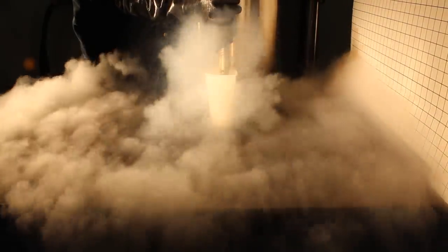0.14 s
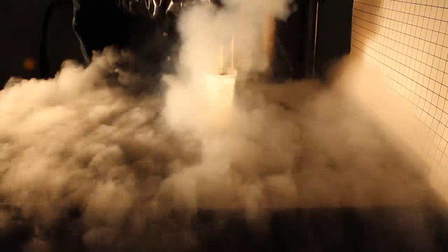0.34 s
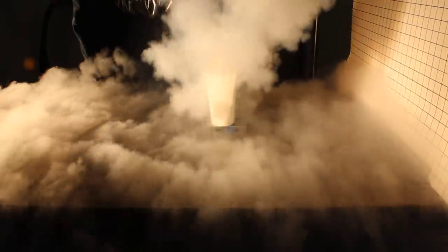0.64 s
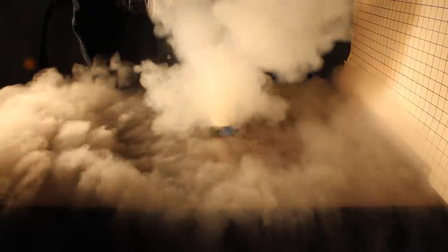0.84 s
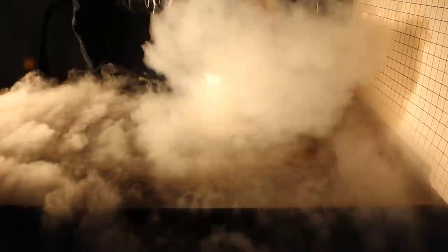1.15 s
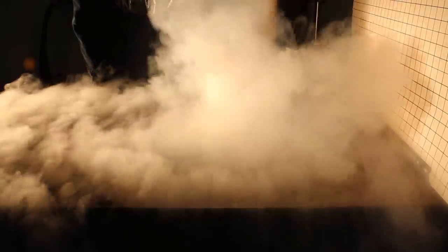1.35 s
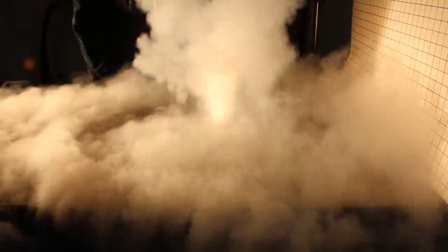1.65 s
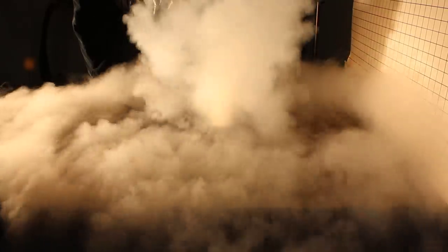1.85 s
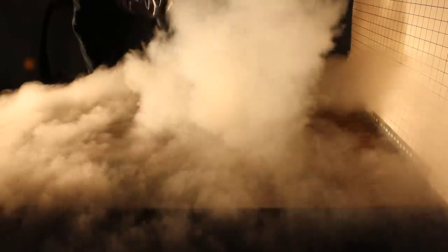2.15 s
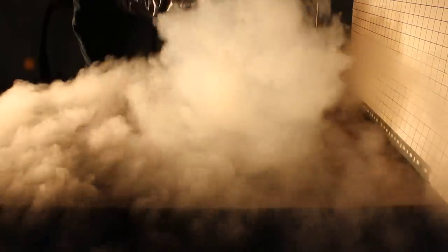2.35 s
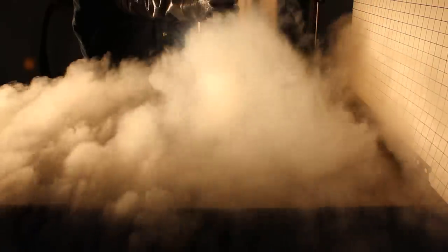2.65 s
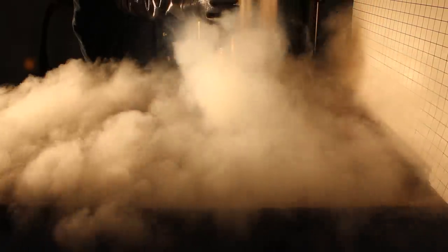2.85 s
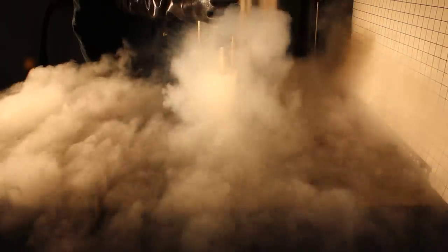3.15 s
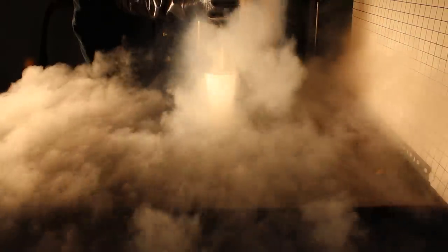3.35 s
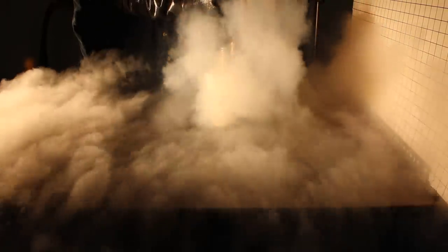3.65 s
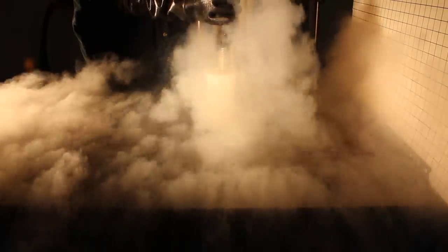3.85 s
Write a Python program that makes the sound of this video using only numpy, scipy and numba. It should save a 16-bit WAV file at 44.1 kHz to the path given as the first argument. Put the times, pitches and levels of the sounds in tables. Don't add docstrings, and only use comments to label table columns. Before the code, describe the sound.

Boiling, fizzing liquid in a cup gushes hollow vapour bursts over a faint fan hum

```python
import sys
import numpy as np
from scipy import signal
from scipy.fft import rfft, irfft, next_fast_len
from scipy.io import wavfile
from numba import njit

SR = 44100
rng = np.random.default_rng(int(sys.argv[2]) if len(sys.argv) > 2 else 0)


def voltage_ratio(level):
    return 10 ** (np.asarray(level, float) / 20)


def unload_audio(sound):
    columns = np.transpose(np.atleast_2d(sound))
    steps = np.round(np.clip(columns, -1, 1) * 32767)
    wavfile.write(sys.argv[1], SR, steps.astype(np.int16))


N = 176400
T = np.arange(N) / SR


def rms_one(x):
    return x / np.sqrt(np.mean(x ** 2) + 1e-20)


def in_time(rows):
    s, *columns = np.transpose(rows)
    return [np.interp(T, s, column) for column in columns]


def drift(rate_hz):
    step = 40
    r = np.exp(-2 * np.pi * rate_hz * step / SR)
    settle = 2000
    noise = rng.standard_normal(N // step + settle + 2)
    slow = signal.lfilter([1], [1, -2 * r, r * r], noise)[settle:]
    return np.interp(np.arange(N) / step, np.arange(len(slow)), rms_one(slow - slow.mean()))


def fizz(grain_share, per_s, spread_db, flicker_db):
    burst = rng.random(N) < per_s / SR
    size_db = spread_db * np.minimum(rng.exponential(1, N), 5)
    pops = burst * voltage_ratio(size_db) * rng.choice([-1, 1], N)
    share = np.clip(grain_share, 0, 1)
    mix = np.sqrt(1 - share) * rng.standard_normal(N) + np.sqrt(share) * rms_one(pops)
    return rms_one(mix * voltage_ratio(flicker_db * (drift(28.0) + drift(170))))


def colour(x, points):
    hz, db = np.transpose(points)
    log_hz = np.log(np.arange(N // 2 + 1) * SR / N + 1)
    outside = np.maximum(0, np.maximum(np.log(hz[0]) - log_hz, log_hz - np.log(hz[-1])))
    shape_db = np.interp(log_hz, np.log(hz), db) - 12 * outside
    return rms_one(irfft(rfft(x) * voltage_ratio(shape_db), N))


def patchy(x, patchy_db):
    spectrum = rfft(x)
    octave = np.log2(np.arange(N // 2 + 1) * SR / N + 1)
    centres = np.arange(10, 14.5, .4)
    out = 0
    for centre in centres:
        share = np.interp(octave, centres, centres == centre)
        out = out + voltage_ratio(patchy_db * drift(11.3)) * irfft(spectrum * share, N)
    return out


@njit
def resonate(x, cosine, r):
    y = np.zeros(len(x))
    for i in range(2, len(x)):
        drive = (1 - r * r) / 2 * (x[i] - x[i - 2])
        y[i] = drive + 2 * r * cosine[i] * y[i - 1] - r * r * y[i - 2]
    return y


def resonate_twice(x, hz, width_hz):
    cosine = np.cos(2 * np.pi * hz / SR) + np.zeros(N)
    r = np.exp(-np.pi * width_hz / SR)
    return resonate(resonate(x, cosine, r), cosine, r)


# start_s (deepest), loss_db, pitch_hz
MODE_CHOKES = [(.1, 6, 1525), (.28, 7, 440), (3.15, 7, 855), (3.99, 10, 255), (.41, 18, 2630),
               (.52, 5, 1640), (.85, 1, 3070), (.9, 2, 2580), (.95, 6, 3650), (1.06, 8, 4435),
               (1.11, 8, 2180), (1.76, 7, 2950), (1.94, 3, 2600), (2.04, 7, 3620), (2.18, 11, 4050),
               (2.46, 5, 1600), (2.53, 3, 3230), (2.58, 8, 1620), (2.76, 9, 3600), (3.19, 2, 2500),
               (3.33, -1, 2580), (3.47, 8, 3520)]
CHOKE_S, CHOKE_REACH = .05, 0.036


def bank(x, modes, patchy_db, waver):
    when, loss_db, choked_hz = np.transpose(MODE_CHOKES)
    dips = np.exp(-((T - when[:, None]) / CHOKE_S) ** 2)
    out = 0
    for hz, width_hz, db in modes:
        hz_then = np.interp(when, T, hz + 0 * T)
        reach = np.exp(-((hz_then / choked_hz - 1) / CHOKE_REACH) ** 2)
        tone = resonate_twice(x, hz * (1 + waver * drift(6.3)), width_hz)
        out = out + voltage_ratio(db + patchy_db * drift(11.0) - (loss_db * reach) @ dips) * tone
    return out


# start_s (peak), hiss_db, length_s, ring_db (cup over hiss)
VAPOUR_SURGES = [(0.072, -19, 0.027, -2), (0.393, -25, 0.023, 0), (0.449, -22, 0.055, -1),
                 (0.513, -25, 0.043, -23), (0.708, -28, 0.087, -22), (1.541, -23.5, 0.039, 0),
                 (1.697, -30.5, 0.059, 3), (1.87, -33, 0.082, 4), (2.033, -33, 0.042, 4),
                 (2.118, -26, 0.031, 8.5), (2.148, -22.5, 0.039, 4), (2.181, -18, 0.0086, 6),
                 (2.215, -22, 0.024, 2.5), (2.327, -28.5, 0.1, 2.5), (2.441, -18, 0.02, -1),
                 (2.494, -28, 0.029, 9.5), (2.531, -22.5, 0.012, 10.5), (2.584, -32.5, 0.032, 15),
                 (2.789, -26.5, 0.032, 6.5), (2.841, -21.5, 0.028, 4.5), (2.865, -22, 0.027, -1),
                 (2.964, -21, 0.061, -8.5), (3.109, -19, 0.024, -6.5), (3.178, -17, 0.035, -2.5),
                 (2.891, -23, 0.006, -5), (3.93, -27, 0.021, -9), (3.497, -20, 0.044, 1.5),
                 (3.736, -26, 0.047, 1), (3.825, -25, 0.045, 0.5), (3.897, -16, 0.015, 6)]
SURGE_FALL, SURGE_POINT = 0.92, 0.97


def surge_shape(ring):
    power = np.zeros(N)
    for s, db, length_s, ring_db in VAPOUR_SURGES:
        late = (T - s) / max(length_s, .004)
        late = np.abs(np.where(late > 0, late / SURGE_FALL, late))
        power += voltage_ratio(2 * (db + ring * ring_db)) * np.exp(-2 * late ** SURGE_POINT)
    return np.sqrt(power)


# warm_hz, chilled_hz, width_hz, level_db
COLUMN_MODES = [(274, 252.6, 31.4, -2), (469.7, 419.3, 65, 2.5), (1000, 778, 115, -7),
                (1033, 890, 142, -8.5), (1608, 1410, 59, 3), (1710, 1472, 89, 2.5), (1667, 1576, 108, -3),
                (1920, 1850, 190, -5), (2145, 2250, 184, -5), (2693, 2485, 266, -2),
                (3230, 3140, 310, -7.5), (3950, 3444, 420, -7), (4226, 3940, 145, -6),
                (5110, 4940, 200, -9.5),
                (3850, 3720, 150, -18), (4690, 4600, 210, -12.5), (5360, 4940, 290, -16),
               (6280, 6230, 350, -15), (7630, 7150, 750, -19), (8270, 8200, 400, -28)]
COLUMN_CHANGE = [6.5, -5.5, 6.5, -1, 10.5, 4, 15, -13, -15, -2.5, 4.5, 4, -6, -6]
LAST_MODES_CHANGE = [0.33, -13, -6, 1, -1, 11]
RING_TILT_HZ = 700


def cup_ring(level_db, chill, spits):
    modes = []
    for mode, change_db in zip(COLUMN_MODES, COLUMN_CHANGE + LAST_MODES_CHANGE):
        warm_hz, chilled_hz, width_hz, db = mode
        hz = warm_hz + (chilled_hz - warm_hz) * chill
        modes.append((hz, width_hz, db + change_db * (chill - .5)))
    drive = fizz(grain_share=0.24, per_s=3000, spread_db=5.0, flicker_db=0.86)
    bright = signal.lfilter(*signal.butter(1, RING_TILT_HZ, "high", fs=SR), drive)
    boil_and_surges = voltage_ratio(level_db) * drive + spits * surge_shape(ring=0.74) * bright
    return 5.54 * bank(boil_and_surges, modes, patchy_db=0.8, waver=0.0072)


# pitch_hz, level_db (per Hz)
OPEN_HISS = [(650, -17), (1300, -10), (2000, -6.5), (3800, -1), (6200, -2), (9000, -6), (12500, -9.5),
             (15800, -8)]


def open_hiss(level_db, hiss_db, spits):
    hiss = colour(fizz(grain_share=0.25, per_s=5000, spread_db=2.0, flicker_db=0.26), OPEN_HISS)
    level = np.hypot(spits * surge_shape(ring=0), voltage_ratio(level_db + hiss_db - 4))
    return level * patchy(hiss, patchy_db=1.96)


# start_s, level_db, chill (of the gas, 0-1), hiss_db (open hiss over the level)
STEADY_BOIL = [(0, -28.5, 0.62, -5), (.2, -25, 0.47, -6.5), (.45, -29.5, 0.22, 2.5), (.62, -28.5, 0.22, 0),
               (.85, -26, 0.04, -11), (1.12, -27, 0, -6), (1.3, -27, 0.24, -5), (1.45, -32.5, 0.4, 2),
               (1.8, -32, 0.24, -1.5), (2.0, -28.5, 0.41, -2), (2.3, -28.5, 0.62, -1),
               (2.55, -24.5, 0.85, -2), (2.72, -24, 0.65, -7.5), (3.0, -28.5, 0.65, -4),
               (3.35, -25.5, 0.63, -5), (3.6, -28.5, 0.7, 5.5), (3.8, -30, 0.71, -1),
               (4.0, -28, 0.83, -2.5)]
SPUTTER_DB, SPUTTER_PER_S = 2, 86


def cup():
    level_db, chill, hiss_db = in_time(STEADY_BOIL)
    spits = voltage_ratio(SPUTTER_DB * drift(SPUTTER_PER_S))
    return cup_ring(level_db, chill, spits) + open_hiss(level_db, hiss_db, spits)


# pitch_hz, level_db (per Hz)
FAN_RUMBLE = [(30, -10.5), (60, -19.5), (105, -24), (150, -15.5), (330, -7.5), (480, -7.5), (660, -13.5),
              (1300, -13)]
FAN_DB = -36
# pitch_hz, level_db (of the sine's peak)
MOTOR_HUM = [(59.2, -69), (118.4, -52), (177.6, -58), (597.5, -54)]
HUM_BEAT_S, HUM_CREST_S, HUM_BEAT_DB = 0.53, .57, 3


def fan():
    beat_db = HUM_BEAT_DB * np.cos(2 * np.pi * (T - HUM_CREST_S) / HUM_BEAT_S)
    hum = 0
    for hz, db in MOTOR_HUM:
        level = voltage_ratio(db + beat_db + 1.3 * drift(1.7))
        hum = hum + level * np.sin(2 * np.pi * (hz * T + rng.random()))
    rumble = colour(rng.standard_normal(N), FAN_RUMBLE)
    return hum + voltage_ratio(FAN_DB + 1.9 * drift(0.95)) * rumble


# start_s (peak), level_db, length_s, pitch_hz
MODE_FLARES = [(.01, -28, .04, 2126), (0.061, -28, 0.034, 2606), (2.3, -33, .08, 1480),
               (0.068, -24, 0.017, 4900), (.92, -37, .12, 1700), (.72, -30, 0.066, 2930),
               (.8, -40, .1, 1710), (1.016, -38, .15, 285), (0.965, -25, 0.055, 2930),
               (.97, -31, .04, 2420), (1.137, -32, 0.055, 1705), (1.8, -34, 0.19, 1597),
               (1.564, -36.5, 0.031, 1630), (1.79, -31, .05, 3700), (2.112, -22.5, .02, 3820),
               (2.185, -16.5, 0.024, 2590), (2.468, -30, 0.035, 2650), (2.597, -32, 0.045, 2296),
               (2.8, -26, .04, 2690), (2.85, -20, 0.027, 1470), (3.0, -41.5, 0.28, 258.4),
               (3.055, -35, .05, 1480), (3.109, -22, .025, 3600), (3.178, -21.5, 0.027, 3700),
               (3.186, -25.5, .03, 4930), (3.196, -33, 0.027, 6000), (3.206, -27.5, 0.034, 3200),
               (3.478, -22, 0.039, 1520), (3.498, -26, .04, 4100), (3.557, -36, .05, 846),
               (3.6, -33, 0.046, 2550), (3.67, -31, 0.045, 2390), (3.724, -28, 0.062, 1515),
               (3.74, -28.5, .04, 2580), (3.823, -26, 0.017, 3650), (3.89, -31, .03, 2260),
               (3.903, -20, 0.016, 1426), (3.9, -31, 0.016, 1000), (0.655, -36, 0.051, 1695),
               (.91, -24, .03, 2930), (1.188, -33, .05, 2930), (1.87, -35, .04, 2670), (2.1, -32, .05, 794),
               (2.14, -31, 0.028, 1600), (2.44, -30, .02, 4850), (2.9, -28, 0.03, 1544),
               (2.968, -30, .03, 3590), (2.97, -31, .03, 7430), (3.31, -28.5, .04, 1670),
               (3.546, -33, 0.044, 3230)]
FLARE_WIDTH = 0.046


def flares():
    noise = fizz(grain_share=0.099, per_s=2800, spread_db=0.0, flicker_db=1.0)
    out = 0
    for s, db, length_s, hz in MODE_FLARES:
        swell = np.exp(-((T - s) / max(length_s, .008)) ** 2)
        out = out + voltage_ratio(db) * swell * rms_one(resonate_twice(noise, hz, FLARE_WIDTH * hz))
    return out


# start_s, level_db
MUFFLED_GUSHES = [
    [(.6, -46), (.72, -35), (.82, -22), (.86, -17.5), (.97, -15.5), (1.01, -17.5), (1.092, -15),
     (1.105, -22.5), (1.42, -37.5)],
    [(1.6, -42), (1.7, -30.5), (1.78, -23.5), (1.85, -43), (1.95, -43)],
]
# pitch_hz, width_hz, level_db
JET_MODES = [(1870, 54, -22), (2204, 99, -2), (2370, 100, -2), (2670, 170, -4.5), (2780, 120, -3),
             (2930, 245, -3), (3200, 54, -8), (3700, 190, -11), (4435, 120, -9.5), (4640, 340, -13),
             (5330, 170, -21.5), (6820, 320, -24), (7400, 110, -24)]


def gush():
    shape = 0
    for rows in MUFFLED_GUSHES:
        inside_s = np.minimum(T - rows[0][0], rows[-1][0] - T)
        shape = shape + np.clip(inside_s / 0.051, 0, 1) * voltage_ratio(in_time(rows)[0])
    drive = fizz(grain_share=0.4, per_s=1800, spread_db=4.0, flicker_db=0.5)
    return shape * rms_one(bank(drive, JET_MODES, patchy_db=1.7, waver=0.0053))


SNAP_S, SNAP_DB, SNAP_HZ = 1.0175, -6, 7500


def snap():
    click = np.zeros(N) + 1e-18
    click[int(SNAP_S * SR)] = voltage_ratio(SNAP_DB)
    return signal.sosfilt(signal.butter(4, SNAP_HZ, "high", fs=SR, output="sos"), click)


# start_s, level_db, pitch_hz
SURFACE_HEAVES = [
    (1.075, -35.5, 172),
    (2.19, -31, 281),
    (2.42, -22.5, 465),
    (2.8, -27.5, 434),
    (3.1, -42, 218),
    (3.418, -22.5, 448),
    (3.45, -32, 246),
    (3.875, -30, 410),
    (2.16, -36, 464),
    (3.645, -31, 423),
]
HEAVE_S, HEAVE_WIDTH = 0.029, 0.4


def heaves():
    noise = rng.standard_normal(N)
    out = 0
    for s, db, hz in SURFACE_HEAVES:
        late = np.maximum(T - s, 0) / HEAVE_S
        puff = np.e * late * np.exp(-late) ** 1.41
        out = out + voltage_ratio(db) * puff * rms_one(resonate_twice(noise, hz, HEAVE_WIDTH * hz))
    return out


ROOM_T60_S, ROOM_DB, WALL_HZ = 0.31, -16.5, 4900


def room(x):
    size = next_fast_len(N + SR)
    hz = np.arange(size // 2 + 1) * SR / size
    walls = 0
    for k, lag_s in enumerate(rng.uniform(.015, .045, 10)):
        loss = voltage_ratio(-60 * lag_s / ROOM_T60_S) / (1 + 1j * hz / WALL_HZ)
        loop = loss * np.exp(-2j * np.pi * hz * lag_s)
        walls = walls + (-1) ** k * loop / (1 - loop)
    return irfft(rfft(x, size) * walls, size)[:N]


def scene():
    near = cup() + flares() + gush() + heaves()
    return (near + voltage_ratio(ROOM_DB) * room(near) + snap() + fan())[None]


def roll_off(x):
    return signal.sosfilt(signal.butter(12, 16240, fs=SR, output="sos"), x)


MIC_NOISE_DB, MIC_LOW_HZ, MIC_HIGH_HZ = -48, 52, 15725
MIC_CEILING, MIC_OFFSET = .95, .001


def record(dry):
    noisy = dry + voltage_ratio(MIC_NOISE_DB) * rng.standard_normal(dry.shape)
    thin = signal.lfilter(*signal.butter(2, MIC_LOW_HZ, "high", fs=SR), noisy)
    rounded = MIC_CEILING * np.tanh(thin / MIC_CEILING)
    passed = np.arange(N // 2 + 1) * SR / N < MIC_HIGH_HZ
    mix = irfft(rfft(rounded) * passed, N) + MIC_OFFSET
    return roll_off(mix)


dry = scene()
out = record(dry)
unload_audio(out)
```